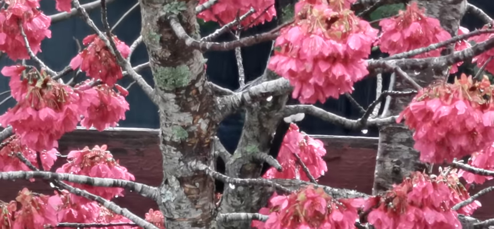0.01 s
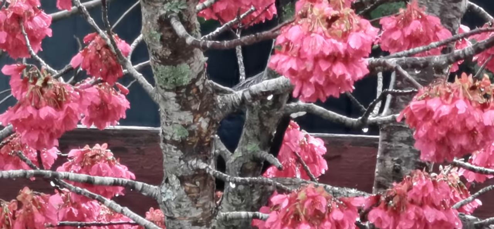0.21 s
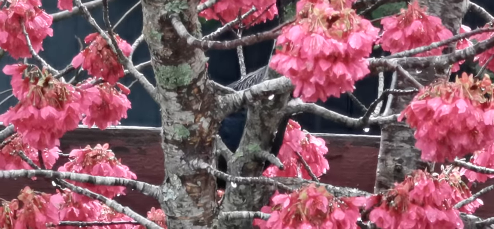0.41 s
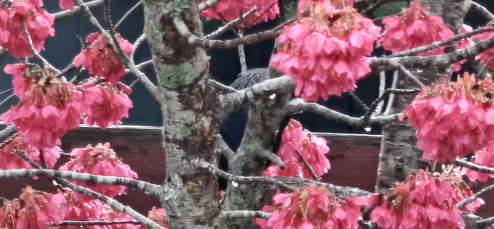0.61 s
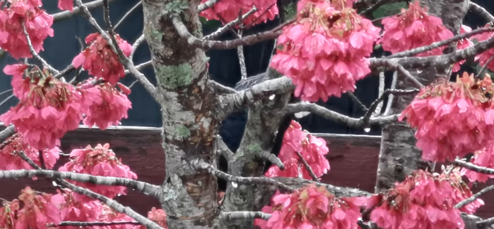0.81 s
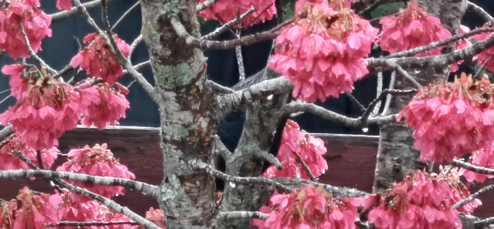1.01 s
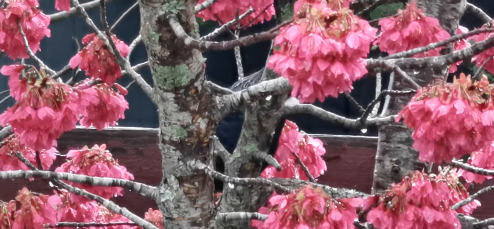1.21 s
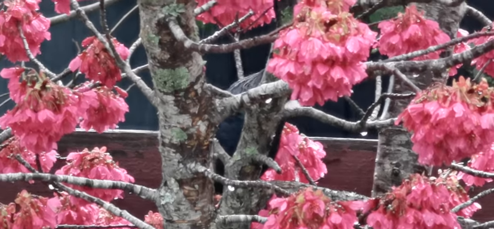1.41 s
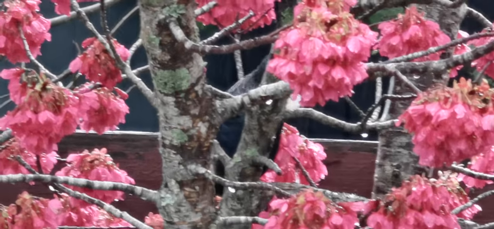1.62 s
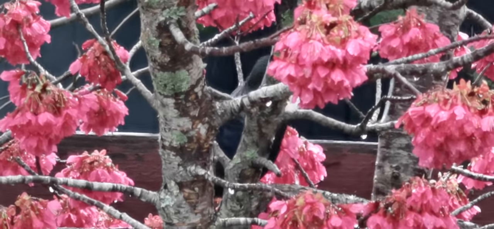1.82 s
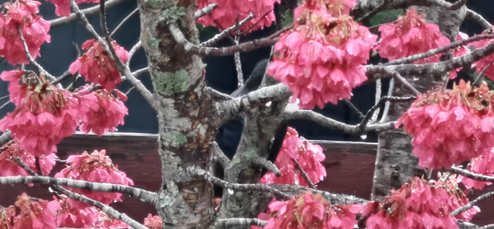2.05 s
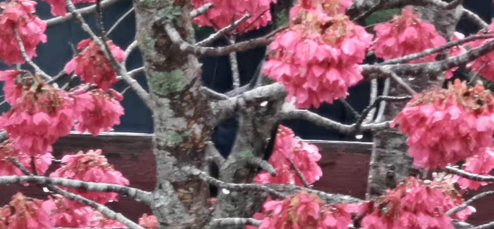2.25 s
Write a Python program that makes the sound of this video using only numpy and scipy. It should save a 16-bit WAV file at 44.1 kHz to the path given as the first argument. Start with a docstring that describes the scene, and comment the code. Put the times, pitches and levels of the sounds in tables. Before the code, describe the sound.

A songbird, slightly to the right in a garden, opens with thin high twitters. A loud harsh screech follows from 0.2 to 0.5 seconds, dropping at its end. A very high squeal at 0.6 leads into a fast dry rattle until 0.8. From 1 second come a squeak, faint clicks and a wheezy trill, then quick slurs and bell-like notes from 1.5 to 2.3. A faint low rumble and hum continue underneath.

```python
"""A garden: a tui sings in a blossoming tree, a little to the right. Thin twitters, a harsh screech,
a dry rattle, then squeaks, slurs and bell-like notes, often two at once from the two sides of its syrinx.
Vibrating membranes make the tones, forced air the wheeze.
A fence and wall close behind reflect the song, over a faint low rumble and hum."""
import sys
import numpy as np
from scipy import signal
from scipy.fft import rfft, irfft, next_fast_len
from scipy.io import wavfile
from scipy.ndimage import map_coordinates

SR = 44100
rng = np.random.default_rng(int(sys.argv[2]) if len(sys.argv) > 2 else 0)


def to_wav(s):
    """Save 16-bit WAV."""
    ch = np.atleast_2d(s).T  # columns
    pcm = np.round(np.clip(ch, -1, 1) * 32767)  # PCM
    wavfile.write(sys.argv[1], SR, pcm.astype(np.int16))


N = 101430

# Background spectra. Each row: frequency in Hz, gain in dB.
RUMBLE_COLOUR = [(12, -11), (20, 0.5), (43, -0.5), (81, -1.5), (114, -2), (203, -6), (231, -6), (426, -17),
                 (528, -24.5), (600, -19.5), (780, -35), (1320, -120)]
AIR_COLOUR = [(300, -14), (600, -1), (850, 1), (1300, -9), (2500, -7.5), (5000, -8.5), (8000, -15),
              (15000, -22)]
# Hum. Each row: frequency in Hz, level in dB.
HUM_TONES = [(118.4, -62.5), (161.5, -64), (199.2, -66)]
# Short notes. Each row: start and length in seconds, first, middle and last pitch in Hz, level in dB,
# octave and twelfth in relative dB, roughness from 0 to 1, left minus right in dB.
NOTES = [ (.003, .030, 4750, 6310, 6660, -44.5, -16, -40, 0.54, -1),
         (.051, 0.028, 4740, 6190, 6770, -42.5, -17, -40, .4, -1),
         (.102, 0.04, 5030, 6330, 6550, -43.5, -16, -40, 0.52, 2),
         (-.005, 0.014, 8800, 9660, 9660, -38, -40, -40, 0.36, 12),
         (0.028, 0.019, 8030, 9970, 10600, -42, -40, -40, 0.41, 3.5),
         (.081, 0.019, 7770, 9200, 10800, -40, -40, -40, 0.42, 7),
         (0.134, 0.015, 7930, 8630, 10100, -39.5, -33, -43, 0.4, 4),
         (0.991, 0.067, 4850, 5090, 5150, -41.5, -30, -35, 0.17, -3.5),
         (0.993, 0.071, 6440, 6450, 6520, -40.5, -29, -37, 0.19, -1.5),
         (1.141, 0.068, 1275, 1339, 1350, -54.5, -14, -4.5, 0.17, -3),
         (1.432, .028, 7320, 9530, 9430, -44, -40, -40, 0.2, -1),
         (1.457, 0.073, 9730, 9250, 9500, -48, -40, -40, 0.25, 3.5),
         (1.445, 0.085, 5970, 5736, 6000, -44.5, -31, -40, 0.19, 1.5),
         (1.498, 0.029, 1614, 1445, 1100, -50.5, -9, -4.5, 0.31, -2.5),
         (1.519, 0.022, 2744, 2316, 2170, -42.5, -16, -20, 0.3, 0),
         (1.538, 0.023, 6240, 5270, 4430, -47.5, -22, -40, 0.7, -2),
         (1.574, .042, 2856, 2248, 1776, -41, -35, -30, 0.2, -1),
         (1.5853, 0.0131, 2420, 2376, 2300, -33, -33, -36, 0.02, 0.5),
         (1.645, 0.096, 5300, 5887, 5100, -52.5, -35, -40, .1, 0.5),
         (1.762, .13, 4490, 4370, 4480, -63.5, -40, -40, 0.37, 2),
         (1.749, 0.031, 7040, 5580, 4210, -48, -17.5, -33, 0.88, 0),
         (1.891, 0.047, 6300, 5210, 4700, -47, -18.5, -21, 0.48, -5),
         (1.92, 0.16, 9580, 8810, 8430, -46.5, -38, -42, 0.11, 2.5),
         (1.908, .16, 4030, 4014, 3834, -59.5, 10, 1, 0.04, 1.5),
         (1.937, 0.12, 4555, 4476, 4190, -59, 10, 1, 0, 1),
         (1.938, 0.096, 5330, 6330, 6750, -51, -13, -38, 0.2, -2),
         (2.218, 0.055, 1826, 1993, 2574, -54.5, -8, -26, 0.22, -2),
         (2.225, 0.027, 6190, 6020, 5630, -57.5, -33, -40, 0.19, 4),
         (2.273, 0.025, 3710, 3870, 3980, -49.5, -35, -43, 0, -6.5)]
# What the open bill lets out. Each row: frequency in Hz, gain in dB.
BILL_RESPONSE = [(1000, -0.5), (11000, 0), (13500, -2.5), (14500, -7), (16000, -12)]
# Firm ringing peaks in the screech, as from close reflections. Each row: frequency in Hz, gain in dB.
SCREECH_COLOUR = [(300, -40), (800, 1), (1000, -1.5), (1420, -1), (1520, -12.5), (1650, 2.5), (1820, -6),
                  (2000, 3), (2250, 2), (2450, 12), (2700, -3), (3500, 0), (4700, 6), (6000, -14),
                  (9000, -10)]
# Main screech voice. Each row: time in seconds, pitch in Hz, voice and rasp levels in dB.
SCREECH_TRACK = [(.231, 1300, -49, -40), (.242, 1783, -27.5, -34), (.27, 1712, -29.5, -31),
                 (.29, 1960, -35, -31), (.325, 2120, -31, -32.5), (.35, 2170, -33.5, -34),
                 (.40, 2030, -27.5, -33.5), (.422, 2123, -35, -38.5), (.44, 1567, -27.5, -40.5),
                 (.453, 1166, -26.5, -44), (.467, 950, -34.5, -55)]
# Lower and upper screech voices; squeal. Each row: time in seconds, pitch in Hz, level in dB.
LOWER_TRACK = [(.236, 1670, -41), (.27, 1660, -38), (.295, 1450, -33), (.36, 1456, -31.5), (.42, 1435, -39),
               (.445, 1400, -39)]
UPPER_TRACK = [(.236, 5400, -48), (.265, 4800, -42.5), (.33, 4830, -40), (.40, 4620, -40),
               (.445, 4560, -43), (.46, 4500, -47)]
SQUEAL_TRACK = [(.594, 10200, -58), (.603, 9150, -38), (.618, 8900, -37), (.64, 8990, -44.5),
                (.665, 8420, -43), (.684, 7800, -47)]
# Rattle strength. Each row: time in seconds, knock and crack levels in dB.
RATTLE_LEVELS = [(.66, -44, -68), (0.676, -35.5, -45), (.692, -30, -38.5), (.706, -34, -30),
                 (.736, -32.5, -28.5), (.767, -31, -28), (.797, -36.5, -29.5), (.813, -42, -31.5)]
# Throat modes rung by each crack. Each row: frequency in Hz, gain in dB, T60 in seconds.
THROAT_MODES = [(2360, -10, .05), (4674, -3, 0.026), (5290, -2.5, 0.039), (6840, -5.5, 0.037)]
# Envelopes of the rattle's croak, squeak's scratch, trill's wheeze. Each row: time in seconds, level in dB.
CROAK_LEVELS = [(.79, -45), (.802, -41.5), (.82, -35), (.83, -57)]
SCRATCH_LEVELS = [(.985, -44.5), (1.0, -49.5), (1.045, -56), (1.065, -81)]
WHEEZE_LEVELS = [(1.27, -51), (1.32, -49.5), (1.41, -43.5), (1.435, -39.5), (1.45, -67)]
# Bill clicks and trill flicks. Each row: start in seconds, level in dB.
BILL_CLICKS = [(1.112, -52), (1.177, -44.5), (1.594, -45.5), (2.279, -58)]
TRILL_FLICKS = [(1.28, -49), (1.311, -61), (1.337, -51.5), (1.368, -52.5), (1.398, -49.5)]
# Spectra of the bird's noises. Each row: frequency in Hz, gain in dB.
RASP_COLOUR = [(300, -48), (1000, -38), (1400, 1), (2300, 6.5), (2700, -19), (3100, -0.5), (3400, -10.5),
               (4200, -5), (4750, -4.5), (5300, -3.5), (6000, -2), (7200, -10.5), (9100, -7),
               (10200, -19.5), (13400, -27), (15500, -36)]
CRACK_COLOUR = [(500, -44), (1500, -22), (2300, -7.5), (2750, -18), (3800, -5), (4650, -2), (5400, 3),
                (5900, -1.5), (6800, -0.5), (7800, -5), (10000, -9), (13600, -18), (15800, -23)]
CROAK_COLOUR = [(300, -30), (600, 3), (850, -1), (1150, 4.5), (1600, 3), (2200, 1), (2800, -35),
                (6000, -40)]
SCRATCH_COLOUR = [(1000, -20), (2300, -6.5), (3000, -18), (3700, 8.5), (4400, -6), (5700, 5.5), (7200, -24),
                  (10000, -21), (11500, 1.5), (12300, -23), (15000, -26)]
CLICK_COLOUR = [(800, -11), (2500, 6), (6000, -1), (9000, -8), (15000, -16)]
WHEEZE_COLOUR = [(800, -32), (1700, 0), (2300, 7.5), (3200, -23), (5200, 1.5), (6100, -3.5), (7000, 8.5),
                 (7900, 5), (9000, -16), (15000, -17)]
# Bell-like notes. Each row: start, length, swell and fade in seconds, pitch in Hz, level in dB,
# octave, twelfth and double octave in relative dB, left minus right in dB.
BELL_NOTES = [(1.691, 0.058, 0.036, 0.03, 3590, -42.5, -11, -7.5, -21, 7),
              (1.779, 0.16, 0.039, .07, 2071, -39.5, -42, -49, -50, -4.5)]
# Near reflections. Each row: delay to the left and right ear in seconds, gain in dB.
WALL_ECHOES = [(.0040, 0.0039, -13.5), (.0118, 0.011, -17.5), (.0196, .0210, -14)]
# Decay of the scattered tail. Each row: frequency in Hz, T60 in seconds.
TAIL_T60_S = [(300, 0.17), (800, 0.31), (1900, 0.38), (5000, 0.3), (9000, 0.24), (15000, 0.1)]
# Colour of the tail; shading of the left ear. Each row: frequency in Hz, gain in dB.
TAIL_COLOUR = [(300, -18), (800, -3), (1500, 1), (5000, 5), (9000, 1.5), (15000, 16.5)]
LEFT_SHADE = [(500, -9), (1400, -2.5), (2100, -6), (4600, 0.5), (7000, -7), (10000, -15.5), (15000, -11.5)]

TIME_S = np.arange(N) / SR


def amp(db):
    """Decibels to gain."""
    return 10 ** (np.asarray(db) / 20)


def unit(x):
    """Scale to rms 1."""
    return x / np.sqrt(np.mean(x ** 2) + 1e-20)


def along(points, hz):
    """Interpolate (Hz, value) points on a log frequency axis."""
    points_hz, values = np.transpose(points)
    return np.interp(np.log(hz + 1), np.log(points_hz + 1), values)


def gate(t, length_s, attack_s, release_s):
    """Smooth rise, hold and fall."""
    rise = np.sin(np.pi / 2 * np.clip(t / attack_s, 0, 1))
    fall = np.sin(np.pi / 2 * np.clip((length_s - t) / release_s, 0, 1))
    return rise * fall


def curves(rows, edge_s=0.0025):
    """A gate over the rows' time span, then each column per sample."""
    times_s, *columns = np.transpose(rows)
    on = gate(TIME_S - times_s[0], times_s[-1] - times_s[0], edge_s, edge_s)
    return [on] + [np.interp(TIME_S, times_s, column) for column in columns]


def wobble(rate_hz, size=N):
    """Smooth random curve, rate_hz knots a second."""
    knots = np.random.default_rng(rng.integers(2 ** 31)).standard_normal(int(size * rate_hz / SR) + 4)
    return map_coordinates(knots, [np.arange(size) * rate_hz / SR])


def filtered(x, response):
    """Apply a response given as a function of Hz."""
    size = next_fast_len(N + SR // 2)
    return irfft(rfft(x, size) * response(np.fft.rfftfreq(size, 1 / SR)), size)[..., :N]


def coloured(x, colour):
    """Filter by (Hz, dB) points."""
    return filtered(x, lambda hz: amp(along(colour, hz)))


def noise(colour):
    """Coloured noise, rms 1."""
    return unit(coloured(rng.standard_normal(N), colour))


def panned(x, pan_db):
    """Place in stereo; pan_db is left minus right."""
    return x * amp([[pan_db / 2], [-pan_db / 2]])


def background(rumble_db=-57.5, air_db=-59.5):
    """Distant rumble and wavering hum, nearly mono, with faint wide air."""
    hum = np.zeros(N)
    for hz, db in HUM_TONES:
        tone = np.sqrt(2) * np.sin(2 * np.pi * hz * TIME_S + 0.54 * wobble(7.28))
        hum += amp(db) * tone * unit(amp(2.5 * wobble(5.96)))
    side = amp(-13.5) * noise(RUMBLE_COLOUR)
    rumble = amp(rumble_db) * (noise(RUMBLE_COLOUR) + np.array([side, -side]))
    wide = np.array([noise(AIR_COLOUR), noise(AIR_COLOUR)])
    air = amp(air_db) * unit(wide + 0.44 * noise(AIR_COLOUR))
    return panned(rumble + hum, pan_db=0.5) + panned(air, pan_db=-3)


def syrinx(hz, partials_db, jitter, flutter_db, chaos_hz):
    """One vibrating membrane: a harmonic tone, unsteady in pitch and strength."""
    hz = hz * (1 + jitter * wobble(chaos_hz, len(hz)))
    phase = 2 * np.pi * np.cumsum(hz) / SR
    tone = sum(amp(db) * np.sin(k * phase) * (k * hz < SR / 2) for k, db in enumerate(partials_db, 1))
    return np.sqrt(2) * tone * unit(amp(flutter_db * wobble(chaos_hz / 2, len(hz))))


def slur(start_s, length_s, pitches_hz, partials_db, rough):
    """A short note bending through three pitches."""
    t = TIME_S - start_s
    on = (t >= 0) & (t < length_s)
    bend = np.polyfit([0, .5, 1], np.log(pitches_hz), 2)
    hz = np.exp(np.polyval(bend, t[on] / length_s))
    tone = syrinx(hz, partials_db, jitter=.06 * rough, flutter_db=2, chaos_hz=691)
    out = np.zeros(N)
    out[on] = tone * gate(t[on], length_s, attack_s=0.25 * length_s, release_s=0.0087)
    return out


def notes():
    """Twitters, squeaks and slurred whistles from the syrinx."""
    out = np.zeros((2, N))
    for start_s, length_s, *pitches_hz, db, octave_db, twelfth_db, rough, pan_db in NOTES:
        note = slur(start_s, length_s, pitches_hz, [0, octave_db, twelfth_db], rough)
        out += panned(amp(db) * note, pan_db)
    return out


def screech():
    """Membranes vibrate chaotically, with ringing peaks, under a pulsing rasp; the pitch ends low."""
    on, hz, voice_db, rasp_db = curves(SCREECH_TRACK)
    main = on * amp(voice_db) * syrinx(hz, [0, -26, -26], jitter=.03, flutter_db=1, chaos_hz=517)
    rasp = on * amp(rasp_db) * unit(noise(RASP_COLOUR) * amp(2.8 * wobble(517)))
    on, hz, db = curves(LOWER_TRACK)
    lower = on * amp(db) * syrinx(hz, [0, -20], jitter=0.0202, flutter_db=-1, chaos_hz=357)
    on, hz, db = curves(UPPER_TRACK)
    upper = on * amp(db) * syrinx(hz, [0], jitter=0.0206, flutter_db=1.5, chaos_hz=497.6)
    voice = coloured(main + lower, SCREECH_COLOUR)
    return panned(voice, pan_db=-2.5) + panned(rasp, pan_db=0.5) + panned(upper, pan_db=1)


def squeal():
    """A very high, rough falling note leading into the rattle."""
    on, hz, db = curves(SQUEAL_TRACK)
    tone = syrinx(hz, [0], jitter=0.045, flutter_db=2, chaos_hz=1480)
    return panned(on * amp(db) * tone, pan_db=6)


def rattle(first_s=.6605, period_s=.01522, count=11, knock_hz=763.6):
    """Even pulses, each a hollow knock and a dry crack that rings the throat; a croak ends them."""
    times_s, knocks_db, cracks_db = np.transpose(RATTLE_LEVELS)
    tones, crack_envelope = np.zeros(N), np.zeros(N)
    t = np.arange(SR // 20) / SR
    held = np.ones(len(t))
    for start_s in first_s + period_s * np.arange(count):
        span = slice(round(start_s * SR), round(start_s * SR) + len(t))
        knock_db = np.interp(start_s, times_s, knocks_db)
        crack_db = np.interp(start_s, times_s, cracks_db)
        bright_db = crack_db - cracks_db.max()  # harder crack, brighter knock
        partials_db = [0, bright_db - 16, bright_db - 13]
        knock = syrinx(knock_hz * held, partials_db, jitter=.02, flutter_db=1, chaos_hz=300)
        tones[span] += amp(knock_db) * knock * gate(t, 0.01, attack_s=0.0042, release_s=0.0052)
        for hz, mode_db, t60_s in THROAT_MODES:
            ring = syrinx(hz * held, [0], jitter=0.024, flutter_db=4, chaos_hz=590)
            tones[span] += amp(crack_db - 4 + mode_db - 60 * t / t60_s) * ring
        crack_envelope[span] += amp(crack_db - 60 * t / 0.03)  # T60 30 ms
    cracks = crack_envelope * noise(CRACK_COLOUR)
    croak = wheeze(CROAK_LEVELS, CROAK_COLOUR, flutter_db=3.5)
    return panned(tones + cracks + croak, pan_db=0)


def wheeze(levels, colour, flutter_db):
    """Fluttering air forced through the syrinx."""
    on, db = curves(levels)
    return on * amp(db) * unit(noise(colour) * amp(flutter_db * wobble(200)))


def scratch():
    """Friction noise at the edge of the loud squeak."""
    return panned(wheeze(SCRATCH_LEVELS, SCRATCH_COLOUR, flutter_db=2.5), pan_db=1.5)


def bill_clicks(t60_s=.014):
    """Faint clicks of the bill: fast-decaying noise bursts."""
    envelope = sum((TIME_S >= start_s) * amp(db - 60 * np.abs(TIME_S - start_s) / t60_s)
                   for start_s, db in BILL_CLICKS)
    return panned(envelope * noise(CLICK_COLOUR), pan_db=1.5)


def trill(flick_s=0.019, sweep_hz=(4300, 3183, 1840)):
    """Quick downward flicks inside a swelling wheeze."""
    flicks = sum(amp(db) * slur(start_s, flick_s, sweep_hz, [0, -3, -12], rough=0.46)
                 for start_s, db in TRILL_FLICKS)
    return panned(flicks + wheeze(WHEEZE_LEVELS, WHEEZE_COLOUR, flutter_db=6), pan_db=1)


def bell_notes():
    """Clear notes of level pitch that swell and fade."""
    out = np.zeros((2, N))
    for start_s, length_s, swell_s, fade_s, hz, db, *overtones_db, pan_db in BELL_NOTES:
        tone = syrinx(np.full(N, hz), [0, *overtones_db], jitter=.0015, flutter_db=1.6, chaos_hz=201.5)
        out += panned(amp(db) * gate(TIME_S - start_s, length_s, swell_s, fade_s) * tone, pan_db)
    return out


def delay(hz, lag_s):
    """Frequency response of a pure delay."""
    return np.exp(-2j * np.pi * hz * lag_s)


def garden(bird, tail_delay_s=0.0017, tail_build_s=0.0079, left_lag_s=0.000436):
    """Fence, wall and branches reflect and scatter a short tail; the left ear is shaded and late."""
    bands_hz, t, spectra = signal.stft(rng.standard_normal((2, SR // 2)), SR, nperseg=256)
    t60_s = along(TAIL_T60_S, bands_hz)[:, None]
    tail = signal.istft(spectra * amp(-60 * t / t60_s) / np.sqrt(t60_s), SR, nperseg=256)[1]
    tail *= np.clip((np.arange(tail.shape[1]) / SR - tail_delay_s) / tail_build_s, 0, 1)
    scatter = signal.fftconvolve(bird, tail / np.linalg.norm(tail[0]), axes=1)[:, :N]
    scatter = amp(-3.5) * coloured(scatter, TAIL_COLOUR)
    walls = sum(amp(db) * filtered(bird, lambda hz: delay(hz, np.array([[left_s], [right_s]])))
                for left_s, right_s, db in WALL_ECHOES)
    left, right = bird + walls + scatter
    left = filtered(left, lambda hz: amp(along(LEFT_SHADE, hz)) * delay(hz, left_lag_s))
    return np.array([left, right])


def scene():
    """The bird in its garden, over the background."""
    song = coloured(notes() + bell_notes(), BILL_RESPONSE)
    bird = song + screech() + rattle() + squeal() + trill() + bill_clicks() + scratch()
    return garden(bird) + background()


def record(dry):
    """Brick-wall low-pass."""
    return filtered(dry, lambda hz: hz < 15820)


dry = scene()
out = record(dry)
to_wav(out)
```